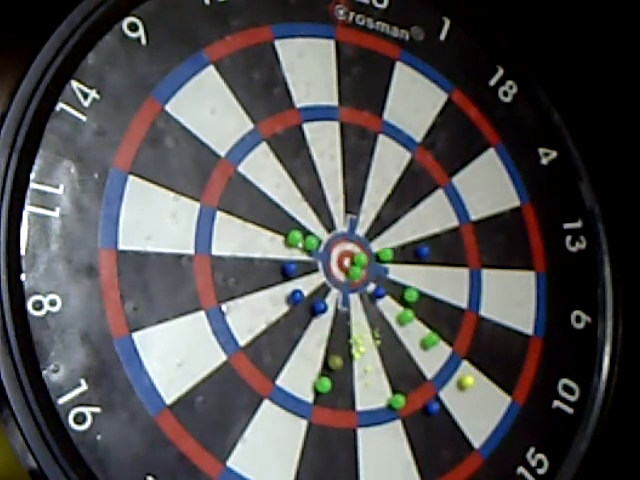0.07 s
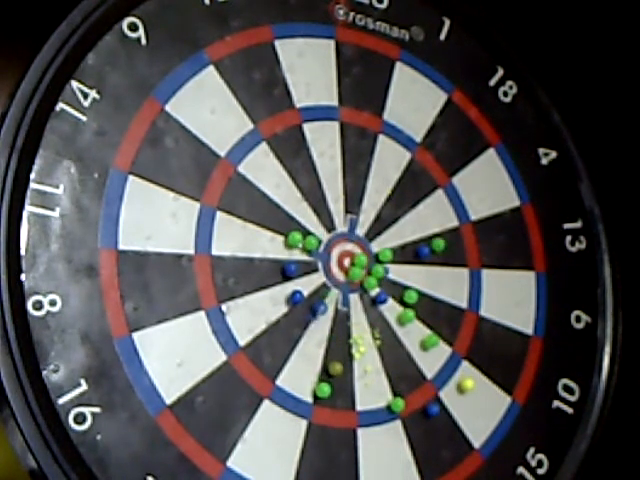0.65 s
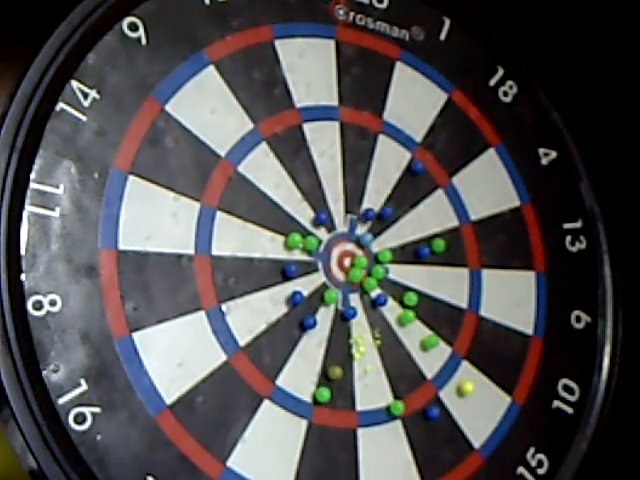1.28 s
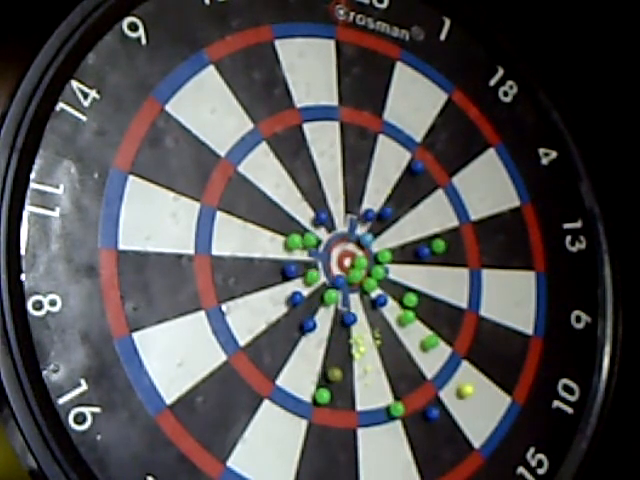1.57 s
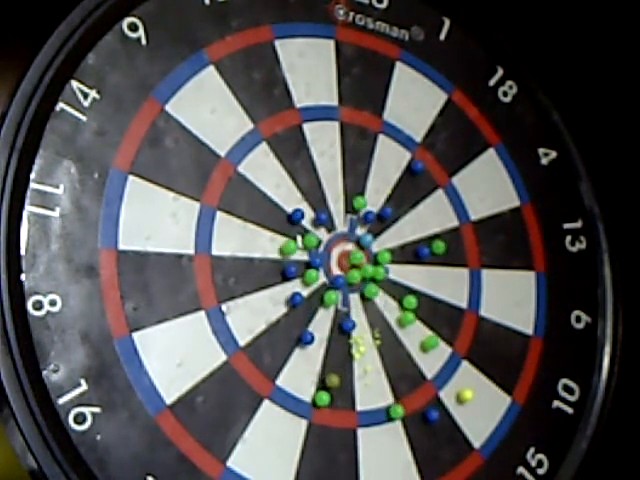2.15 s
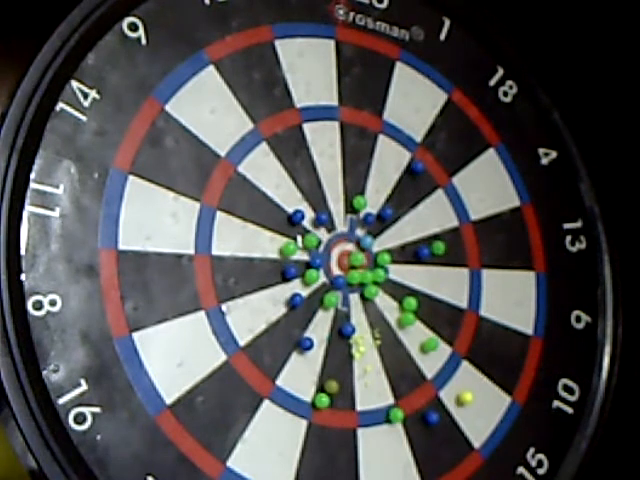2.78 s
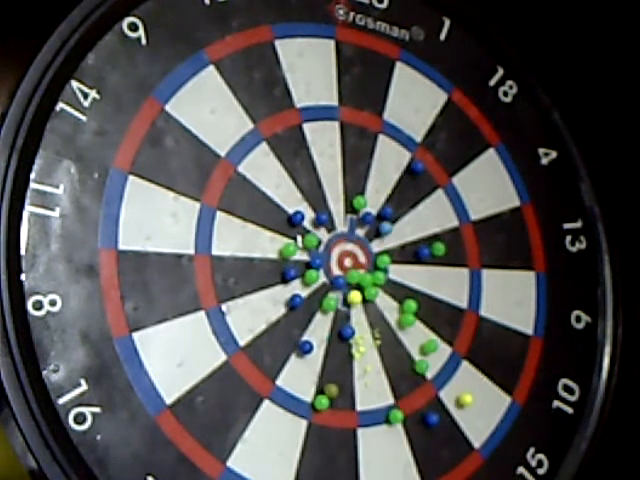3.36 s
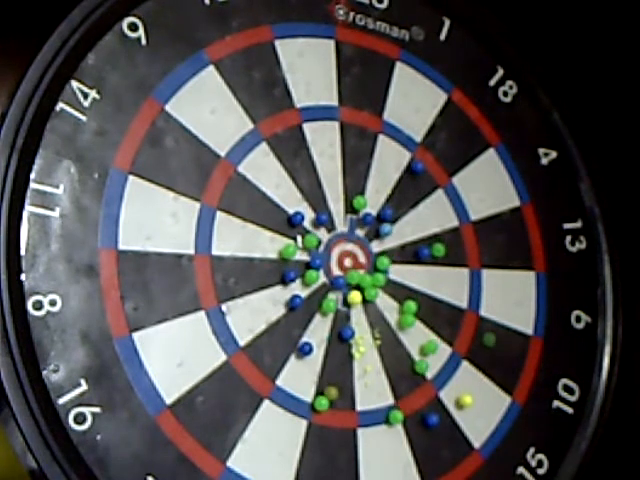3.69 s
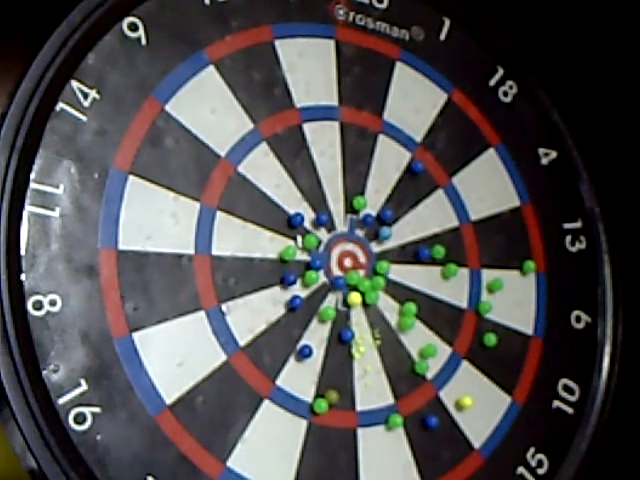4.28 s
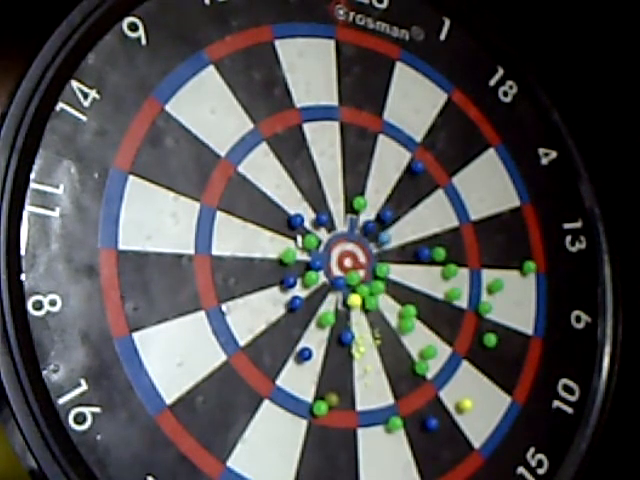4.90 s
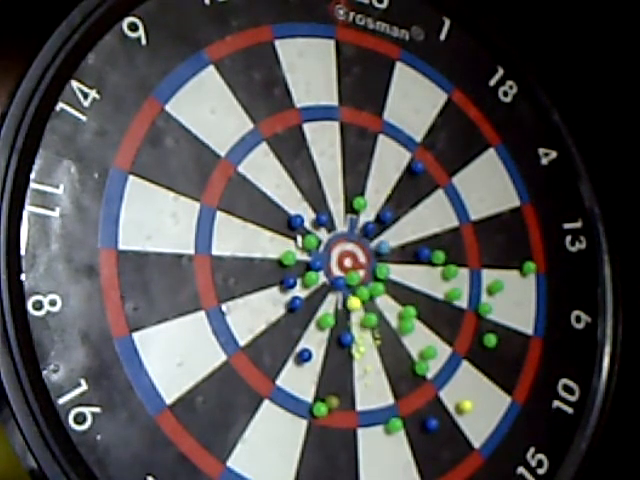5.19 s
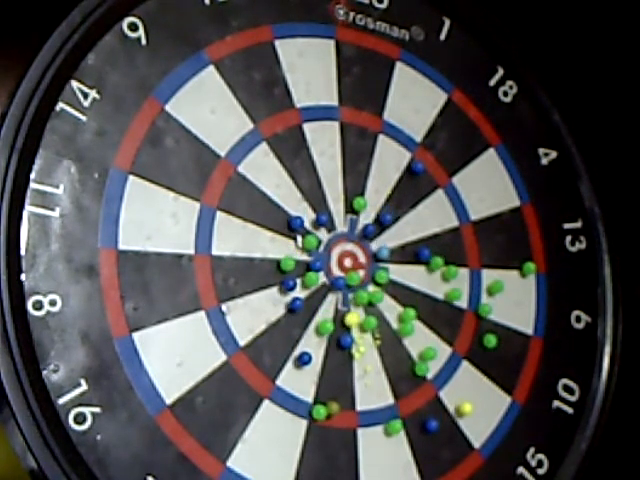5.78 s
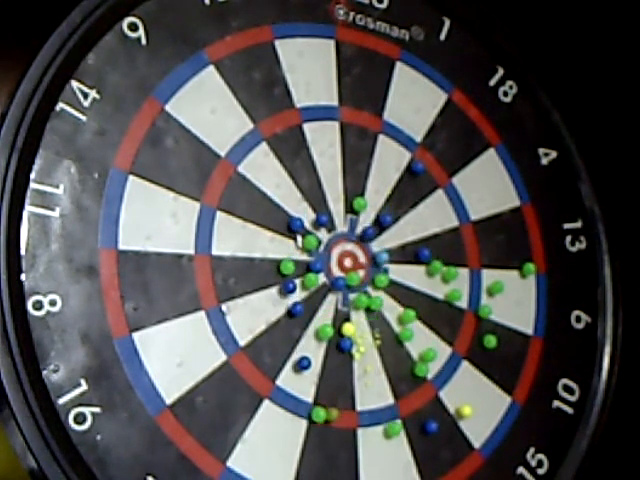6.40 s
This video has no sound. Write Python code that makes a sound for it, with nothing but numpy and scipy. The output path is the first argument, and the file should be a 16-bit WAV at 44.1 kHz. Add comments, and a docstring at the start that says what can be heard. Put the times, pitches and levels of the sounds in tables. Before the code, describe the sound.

In a room, an electric airsoft rifle fires a rapid rattle of about two seconds, its motor whining and gears grinding under the echoing piston slams. Pellets thud into a sticky gel target close to the microphone, and a few crack on hard plastic. Three shorter bursts follow, with soft knocks and rubs of hands on the gun in the pauses, over faint rumble and hiss.

```python
"""In a room, an electric airsoft rifle fires on full auto at a sticky gel target beside the listener.
For every shot the motor's whine sags under the load of the spring; then the piston slams, and its
impact arrives mostly as reverberation. Pellets thud into the gel close by, and a few crack on hard
plastic. Between bursts, hands knock and rub softly on the gun, over a faint rumble and hiss."""
import sys
import numpy as np
from scipy import signal
from scipy.fft import rfft, irfft
from scipy.io import wavfile

SR = 44100
rng = np.random.default_rng(int(sys.argv[2]) if len(sys.argv) > 2 else 0)


def store_pcm(level_fs):
    """Save levels as 16-bit WAV."""
    pcm = np.round(np.clip(level_fs, -1, 1) * 32767).astype(np.int16)
    wavfile.write(sys.argv[1], SR, np.atleast_2d(pcm).T)


N = 293023
TIME = np.arange(N) / SR
CYCLE_S = 0.104   # nominal period of fire

# trigger pulls: (first slam [s], last slam [s], motor lead [s], last slam to kick-back [s])
BURSTS = [(0.016, 2.2025, 0.065, 0.16), (3.010, 3.118, 0.042, 0.155), (3.692, 4.526, 0.072, 0.132),
          (6.373, 6.587, 0.066, 0.15)]
# pellets landing in the gel: (time [s], level [dB])
GEL_LANDINGS = [(0.3017, -21.5), (0.4049, -21), (0.5056, -20), (0.733, -26), (0.8178, -20.5), (0.9213, -23),
                (1.027, -23), (1.128, -21), (1.2335, -22), (1.444, -27.5), (1.5445, -20), (1.662, -24.5),
                (1.7558, -22), (1.8571, -22), (1.965, -32.5), (2.065, -25.5), (2.174, -28), (3.093, -28),
                (3.2068, -30.5), (3.7686, -28.5), (3.8764, -27), (3.9794, -28), (4.0838, -28), (4.187, -27),
                (4.5, -26.5)]


def from_db(db):
    """Amplitude ratio of a level in decibels."""
    return 10 ** (np.asarray(db) / 20)


def unit_rms(x):
    """Normalise to an rms of 1."""
    return x / np.sqrt(np.mean(x ** 2) + 1e-20)


def with_energy(x, seconds):
    """Give a transient the energy of a unit-rms signal of the stated duration."""
    return x * np.sqrt(seconds * SR / (np.sum(x ** 2) + 1e-20))


def at_hz(points, hz):
    """Interpolate on a logarithmic frequency axis."""
    known, values = np.transpose(points)
    return np.interp(np.log(np.maximum(hz, 1)), np.log(known), values)


def add(track, onset_s, sound):
    """Superpose a sound on a track."""
    start = max(int(onset_s * SR), 0)
    track[start:start + len(sound)] += sound[:N - start]


def butter(x, hz, kind, order=2):
    """Butterworth filter: maximally flat in its passband."""
    return signal.sosfilt(signal.butter(order, np.clip(hz, 10, .45 * SR), kind, fs=SR, output="sos"), x)


def convolve(x, response):
    """Output of a linear system, cut to the length of its input."""
    return signal.fftconvolve(x, response)[:len(x)]


def minimum_phase(spectrum, modes=(), size=8192):
    """Minimum-phase impulse response of unit energy: a broad spectrum lifted by resonances."""
    hz = np.arange(size // 2 + 1) * SR / size
    peaks_db = sum(lift / (1 + (2 * (hz - centre) / width) ** 2) for centre, width, lift in modes)
    cepstrum = irfft(np.log(from_db(at_hz(spectrum, hz) + peaks_db)))
    cepstrum[1:size // 2] *= 2
    cepstrum[size // 2 + 1:] = 0
    response = irfft(np.exp(rfft(cepstrum)))[:size // 2]
    return response / np.linalg.norm(response)


def reflections(size=24576):
    """Diffuse field: dense echoes with a flat spectrum and random phase."""
    return unit_rms(irfft(np.exp(2j * np.pi * rng.random(size // 2 + 1))))


def room_response(pattern, build_s, early_db, early_t60):
    """Reverberation: echoes build up, fall quickly at first, then decay exponentially band by band."""
    # the room's decay: (frequency [Hz], reverberation time [s])
    room_t60 = [(100, 0.21), (400, 0.23), (1200, 0.27), (3000, 0.33), (7000, 0.46), (11000, 0.2)]
    t, spectrum = TIME[:len(pattern)], rfft(pattern)
    hz = np.fft.rfftfreq(len(pattern), 1 / SR)
    centres, t60s = np.transpose(room_t60)
    out = pattern * from_db(early_db - 60 * t / early_t60)
    for weights, t60 in zip(np.eye(len(centres)), t60s):
        band = irfft(spectrum * at_hz(np.column_stack([centres, weights]), hz))
        out += band * from_db(-60 * t / t60)
    out *= 1 - np.exp(-(t / build_s) ** 1.5)
    return out / np.linalg.norm(out)


def noise_floor(level_db=-70.5):
    """Stationary noise: a faint rumble and a thin electronic hiss."""
    # background spectrum: (frequency [Hz], level [dB])
    spectrum = [(25, -2), (50, -3), (110, -2), (170, -10), (400, -15), (1000, -19.5), (2500, -27),
                (5000, -34.5), (8000, -31), (11000, -31.5)]
    # peak of the hiss: (frequency [Hz], bandwidth [Hz], gain [dB])
    hiss_peak = [(8720, 290, 14)]
    return from_db(level_db) * convolve(rng.standard_normal(N), minimum_phase(spectrum, hiss_peak))


def slam_times():
    """Periodic motion: the piston's slams are evenly spaced within each burst."""
    return np.concatenate([np.linspace(first, last, round((last - first) / CYCLE_S) + 1)
                           for first, last, *_ in BURSTS])


def rifle_db(time_s):
    """Level envelope common to motor and slams."""
    # the rifle's envelope: (time [s], level [dB])
    levels = [(0, -24), (0.55, -22.5), (1.15, -23.5), (1.3, -25.5), (1.5, -23.5), (1.66, -26), (1.8, -22.5),
              (2.0, -26.5), (2.2, -27), (3.0, -28), (4.4, -30), (6.5, -28.5)]
    return np.interp(time_s, *np.transpose(levels))


def gear_motion(spin_up_s=0.011, swell_s=0.035, run_on_s=0.055, coast_s=0.2, kick_s=0.16):
    """Inertia: the gears spin up, run and coast, until the half-cocked spring drives them back."""
    speed, effort = np.zeros((2, N))   # fractions of full running
    for first, last, lead_s, kick_delay_s in BURSTS:
        elapsed = np.maximum(TIME - (first - lead_s), 0)
        coast = np.clip(1 - (TIME - last - run_on_s) / coast_s, 0, 1)
        kick = np.interp(TIME - last - kick_delay_s, [0, 0.01, kick_s], [0, 1, 0])
        speed += np.maximum((1 - np.exp(-elapsed / spin_up_s)) * coast, 0.5 * kick)
        effort += (1 - np.exp(-elapsed / swell_s)) * coast ** 2.2 + from_db(-0.5) * kick ** 1.7
    return np.clip(speed, 0, 1), effort


def gearbox(free_hz=2610, loaded_hz=2178, cocking_s=0.06, recovery_s=0.03, take_up_s=0.014):
    """Gear-mesh tone and noise: the whine sags as the spring tightens; the grind dulls as gears slow."""
    # grinding spectrum: (frequency [Hz], level [dB])
    gear_spectrum = [(80, -27), (210, -18), (320, -4), (600, -5), (900, 0.5), (1450, -5), (1900, -6),
                     (2500, -7), (3600, -10.5), (6000, -16), (8500, -15), (11000, -23)]
    # stock resonances driven by the gears: (frequency [Hz], bandwidth [Hz], gain [dB])
    stock_modes = [(1070, 130, 2), (1390, 210, 8), (1950, 250, 1.5)]
    speed, effort = gear_motion()
    slams = slam_times()
    tension = sum(np.interp(TIME - slam, [-cocking_s, 0, recovery_s], [0, 1, 0]) for slam in slams)
    mesh_hz = speed * (free_hz + tension * (loaded_hz - free_hz))
    # uneven teeth modulate frequency and amplitude
    wobble, flutter = [unit_rms(butter(rng.standard_normal(N), 200, "low")) for _ in range(2)]
    phase = 2 * np.pi * np.cumsum(mesh_hz * (1 + .027 * wobble)) / SR
    tone = unit_rms((np.sin(phase) + from_db(-19) * np.sin(2 * phase)) * (1 + .6 * flutter))
    # the teeth sing loudest while they carry the spring's load
    loaded = sum(np.clip(np.minimum(TIME - slam + cocking_s, slam - TIME) / take_up_s, 0, 1)
                 for slam in slams)
    whine = tone * from_db(-2.5 - 7 * (1 - loaded)) * (speed * effort) ** 2
    noise = convolve(rng.standard_normal(N), minimum_phase(gear_spectrum, stock_modes))
    dull = butter(noise, 1800, "low", order=1)
    grind = from_db(-2) * (dull + speed * (noise - dull))
    gain = effort * from_db(rifle_db(TIME) - 15)
    return gain * whine, gain * grind


def piston(gain_db=1.23, treble_hz=3500, treble_t60=0.34, rattle_s=0.08, spit_s=0.0015, coherence=0.3):
    """Impact excitation: each slam rattles the gun's resonances and fills the room with echoes."""
    # slam spectrum: (frequency [Hz], level [dB])
    slam_spectrum = [(50, -23), (130, -19.5), (210, -16), (300, -5), (450, -2), (900, -3.5), (1500, -2.5),
                     (2600, -6), (3800, -6), (4800, -8), (6400, -14), (8400, -8), (9600, -15), (11000, -22)]
    # resonances of gearbox shell, stock and barrel: (frequency [Hz], bandwidth [Hz], gain [dB])
    gun_modes = [(443, 35, 6), (535, 52, 3.5), (646.4, 23, 8.5), (804, 50, 8), (971, 79, 4.5),
                 (1049, 120, 6), (1256, 21, 3), (1331, 33, 5.5), (1402, 56, 7), (1435, 21, 6),
                 (1967, 60, 7.5), (2363, 83, 10), (3124, 130, 1.5), (3330, 120, 10.5), (3676, 27, 9),
                 (4420, 80, -6), (5990, 730, 6.5), (7540, 160, 9)]
    out, walls = np.zeros(N), reflections()
    t = TIME[:len(walls)]
    for slam in slam_times():
        # a shot that reaches the gel is bright and sudden; a misfeed or stray is dull and slow
        clean = any(0 < landing - slam < CYCLE_S for landing, _ in GEL_LANDINGS)
        shot_db, treble_db, swell_s = (0, 5.5, 0.0036) if clean else (-0.38, -2, 0.0055)
        # the gun shifts, so only part of the echo pattern repeats
        pattern = np.sqrt(coherence) * walls + np.sqrt(1 - coherence) * reflections()
        rattle = from_db(2.5 * np.exp(-t / rattle_s) * unit_rms(butter(reflections(), 470, "low")))
        blow = room_response(pattern * rattle, swell_s, early_db=9, early_t60=0.24)
        dull = butter(blow, treble_hz, "low", order=1)
        # a hard slam is brightest at its start, as air spits from the muzzle
        treble_gain = from_db(0.51 * treble_db * from_db(-60 * t / treble_t60))
        blow = dull + treble_gain * (blow - dull)
        spit = butter(reflections(), [7900, 9600], "band") * t * np.exp(-t / spit_s)
        shot = with_energy(blow, 0.054) + from_db(treble_db - 17) * with_energy(spit, 0.054)
        add(out, slam, from_db(rifle_db(slam) + shot_db + gain_db) * shot)
    return convolve(out, minimum_phase(slam_spectrum, gun_modes))


def board_tock(t, scatter_db=2.5, detune=0.03):
    """Free vibration of damped modes: each point of impact weights and shifts them a little."""
    # modes of the target's face: (frequency [Hz], level [dB], 60 dB decay time [s])
    board_modes = [(190, -23.5, .045), (345, -25, .03), (569, 1.5, 0.037), (720, -13, 0.0069),
                   (923, 3, 0.024), (1150, -11, 0.019), (1350, 0.5, 0.014), (1799, 7, 0.03),
                   (2180, -3.5, .01), (3180, -4, 0.021)]
    hz, db, t60 = np.transpose(board_modes)[:, :, None]
    strength, shift = rng.standard_normal((2, len(board_modes), 1))
    polarity = (-1) ** np.arange(len(board_modes))[:, None]
    envelopes = from_db(db + scatter_db * strength - 60 * t / t60)
    return np.sum(polarity * envelopes * np.sin(2 * np.pi * hz * (1 + detune * shift) * t), axis=0)


def gel_thuds(snap_t60=0.0069, size=4096):
    """Inelastic collision: a pellet stops in the gel with a push of air, a snap and a tock of the board."""
    out, t = np.zeros(N), TIME[:size]
    push = with_energy(butter(signal.unit_impulse(size), [450, 1300], "band", order=1), 0.02)
    for onset, db in GEL_LANDINGS:
        tock = with_energy(board_tock(t), 0.0056)
        thud = butter(tock + from_db(-7.5) * push, [155, 4500], "band")
        snap = butter(rng.standard_normal(size), [2200, 8200], "band") * from_db(-60 * t / snap_t60)
        landing = from_db(0.5) * thud + from_db(-14.5) * with_energy(snap, 0.019)
        add(out, onset, from_db(db) * landing)
    return out


def plastic_cracks(crack_t60=0.014, rim_t60=0.06, echo_db=-9.5):
    """Hard contact is brief, hence broadband: a pellet cracks on plastic; the rim rings, the room echoes."""
    # pellet strikes: (time [s], level [dB], rim frequency [Hz], relative rim level [dB])
    strikes = [(2.2711, -25.5, 1353, -8), (2.5384, -31.5, 1340, -10), (3.4865, -31, 1240, -11),
               (6.4561, -21.5, 1115, -17.5)]
    # spectrum of struck plastic: (frequency [Hz], level [dB])
    plastic_spectrum = [(60, -24), (300, -11), (900, -7), (1600, -6.5), (3300, -4.5), (5200, -8.5),
                        (7300, -3), (9000, -3.5), (11000, -21)]
    out, plastic = np.zeros(N), minimum_phase(plastic_spectrum)
    for onset, db, rim_hz, rim_db in strikes:
        echo = room_response(reflections(), build_s=0.005, early_db=14.5, early_t60=0.15)
        t = TIME[:len(echo)]
        direct = with_energy(reflections() * from_db(-60 * t / crack_t60), 0.0073)
        crack = convolve(direct + from_db(echo_db) * with_energy(echo, 0.0082), plastic)
        rim = with_energy(np.sin(2 * np.pi * rim_hz * t) * from_db(-60 * t / rim_t60), 0.008)
        add(out, onset, from_db(db) * (crack + from_db(rim_db) * rim))
    return out


def handling(gain_db=1.5, size=8192):
    """Friction noise: hands on trigger, grip and stock give soft knocks and short rubs."""
    # touches: (time [s], level [dB], low-pass cutoff [Hz], duration [s])
    touches = [(2.716, -63, 2180, 0.0065), (2.812, -89, 3500, 0.0047), (2.843, -80, 1310, 0.011),
               (3.438, -62.5, 1700, 0.019), (4.818, -72, 2810, 0.017), (5.02, -67, 3940, 0.028),
               (5.206, -70, 2990, 0.032), (5.268, -69.5, 3430, 0.022), (5.407, -73, 2200, .02),
               (5.442, -69.5, 2570, 0.016), (5.607, -62.5, 5000, 0.023), (5.677, -62.5, 11000, 0.054),
               (5.965, -59.5, 1680, .014)]
    # rubbing spectrum: (frequency [Hz], level [dB])
    rub_spectrum = [(100, -9), (500, -7.5), (1000, 0.5), (2200, -8), (3500, -5.5), (7000, -0.5),
                    (11000, -9.5)]
    # resonances of the grip: (frequency [Hz], bandwidth [Hz], gain [dB])
    grip_modes = [(1310, 300, 3), (2220, 660, 7)]
    out, t, grip = np.zeros(N), TIME[:size], minimum_phase(rub_spectrum, grip_modes)
    for onset, db, cutoff_hz, length_s in touches:
        friction = rng.standard_normal(size) * np.sqrt(t) * np.exp(-2 * t / length_s)
        rub = butter(convolve(friction, grip), cutoff_hz, "low", order=3)
        add(out, onset, from_db(db + gain_db) * with_energy(rub, 0.04))
    return out


def scene():
    """Direct-to-reverberant ratio: the far gun arrives through the room; the near target is almost dry."""
    whine, grind = gearbox()
    far = room_response(reflections(), build_s=0.0013, early_db=2, early_t60=0.16)
    near = room_response(reflections(), build_s=0.016, early_db=-2.5, early_t60=0.11)
    diffuse = convolve(grind + handling() + from_db(-1) * whine, far)
    rifle = piston() + diffuse + from_db(5) * whine + from_db(-2) * grind
    thuds = gel_thuds()
    target = thuds + from_db(-9.5) * convolve(thuds, near)
    return (noise_floor() + rifle + target + plastic_cracks())[None]


def record(dry, cutoff_hz=11150):
    """Band limiting: an elliptic low-pass cuts the top of the treble steeply."""
    return signal.sosfilt(signal.ellip(12, .2, 75, cutoff_hz, fs=SR, output="sos"), dry)


dry = scene()
out = record(dry)
store_pcm(out)
```